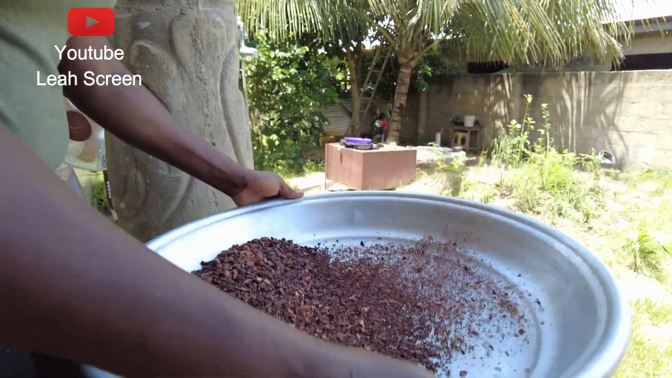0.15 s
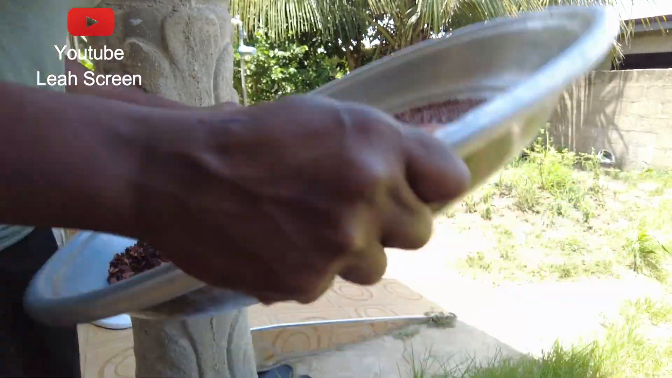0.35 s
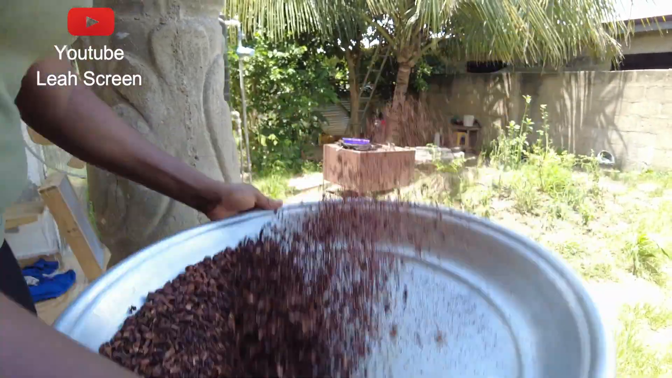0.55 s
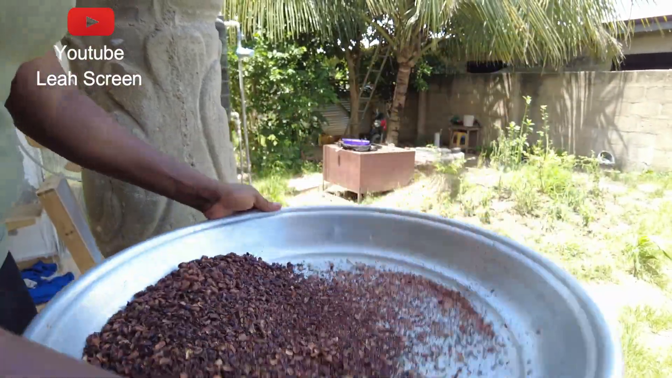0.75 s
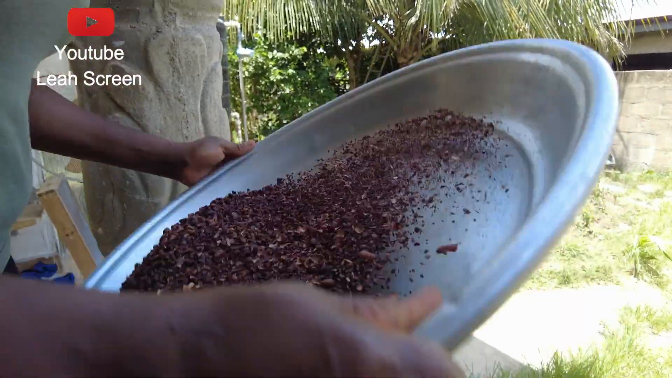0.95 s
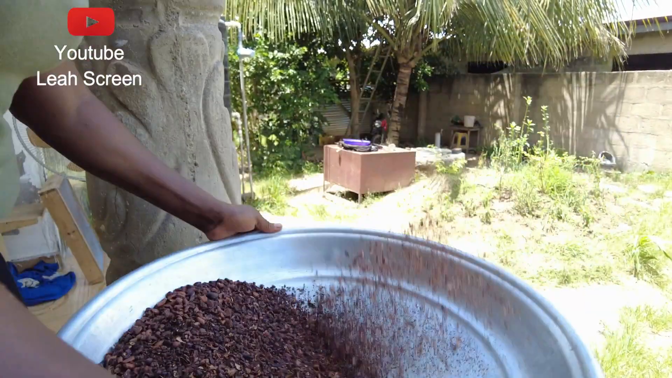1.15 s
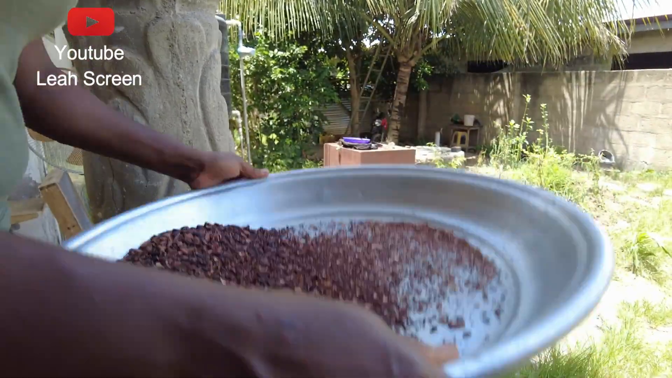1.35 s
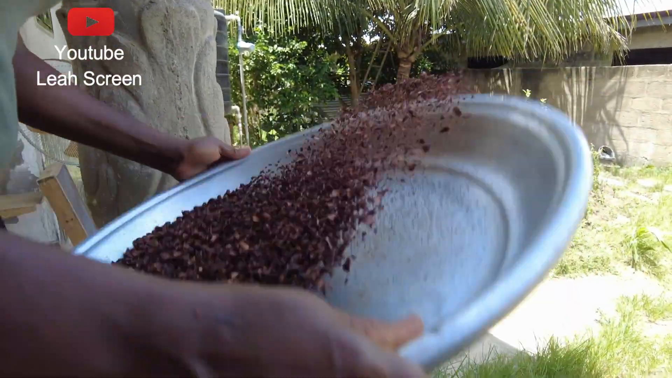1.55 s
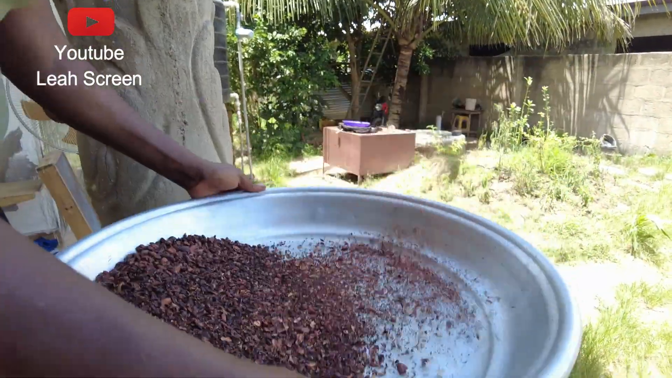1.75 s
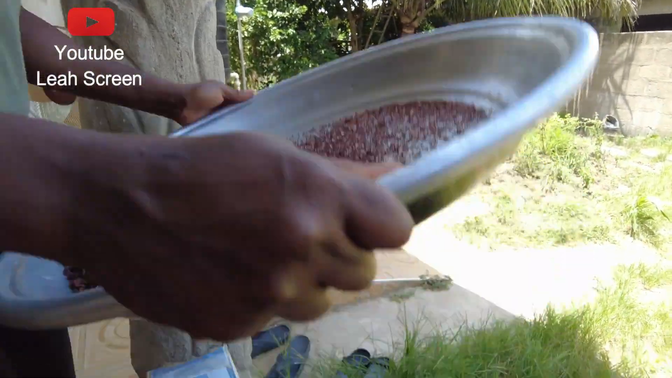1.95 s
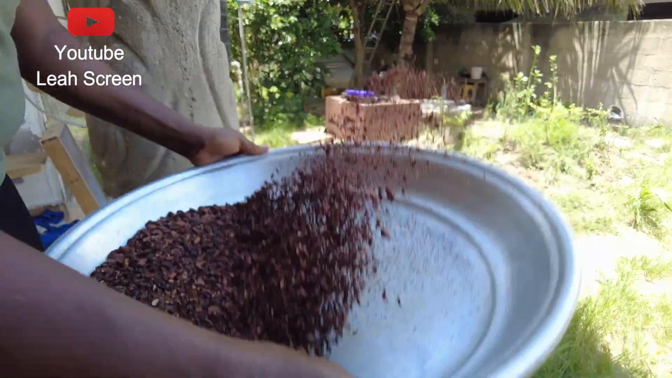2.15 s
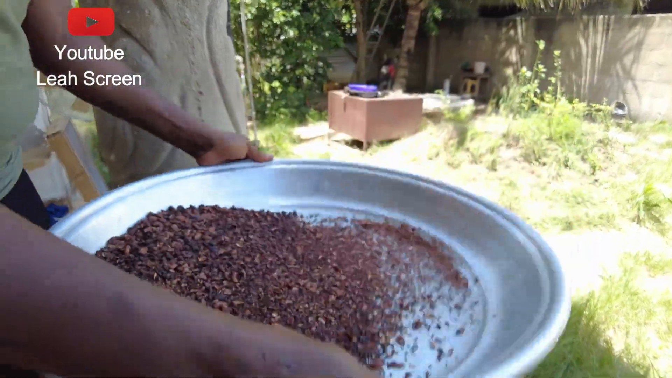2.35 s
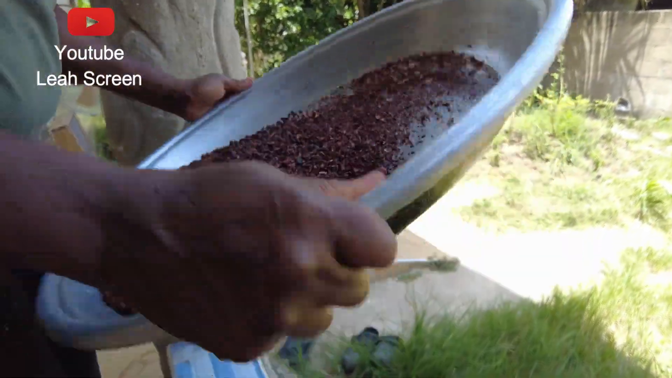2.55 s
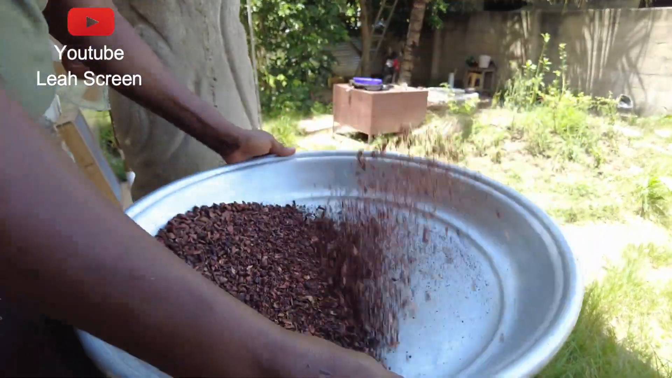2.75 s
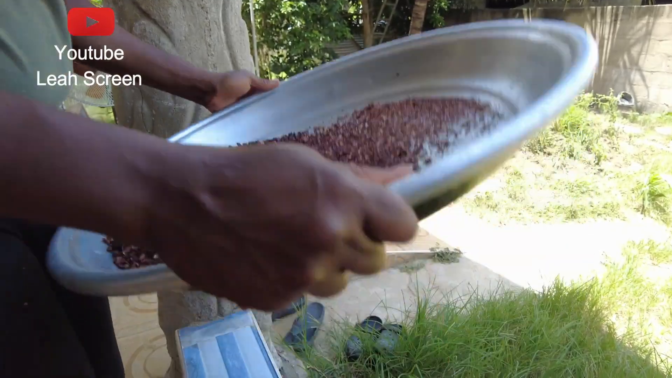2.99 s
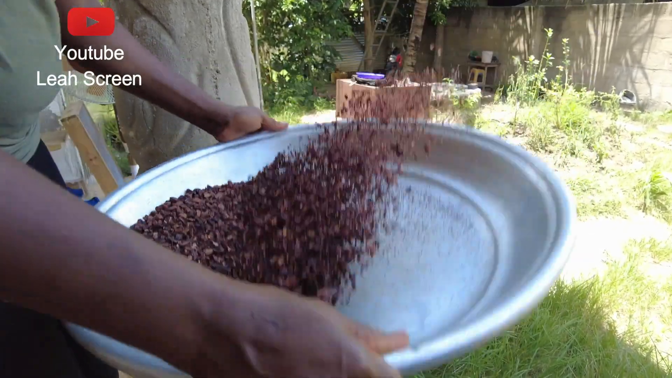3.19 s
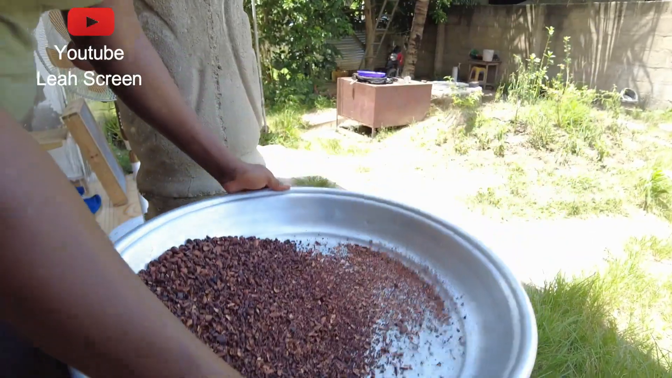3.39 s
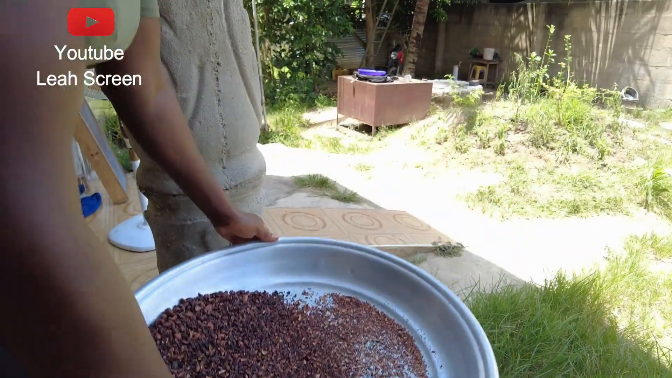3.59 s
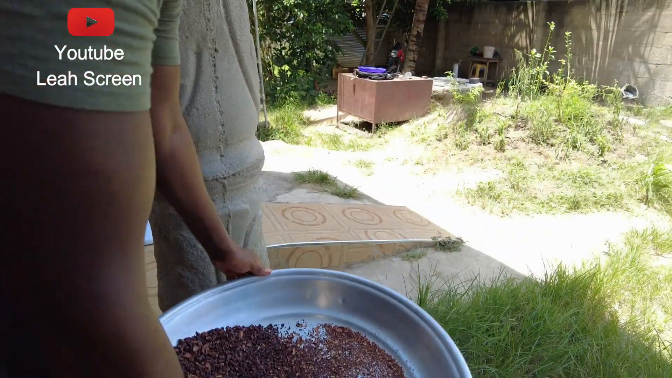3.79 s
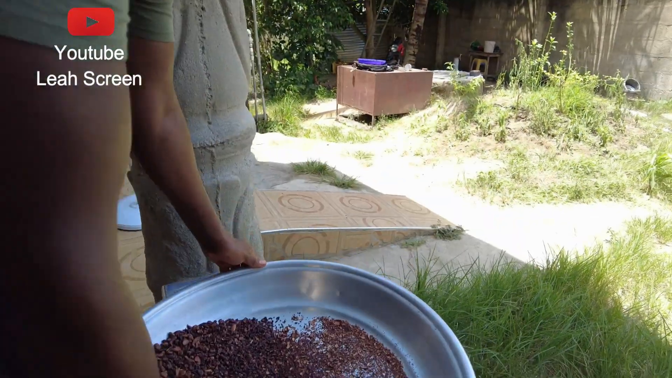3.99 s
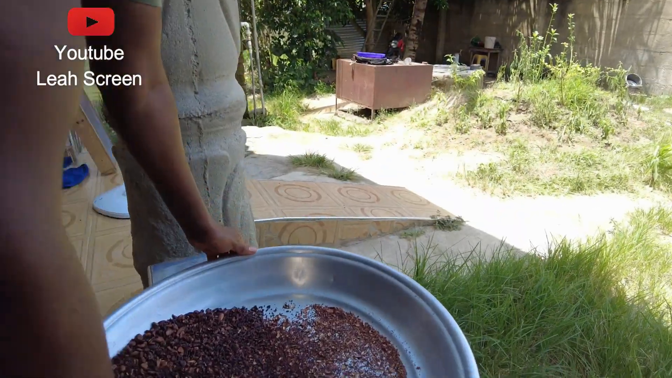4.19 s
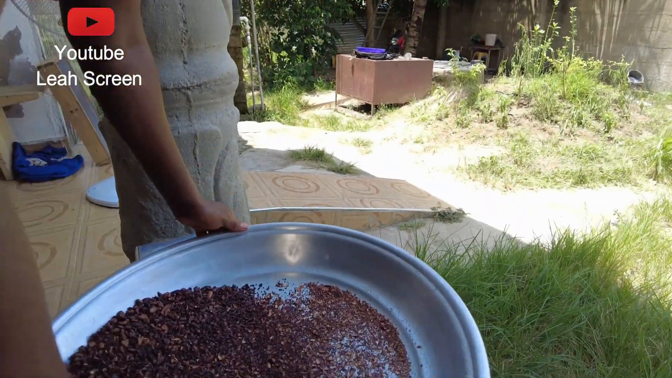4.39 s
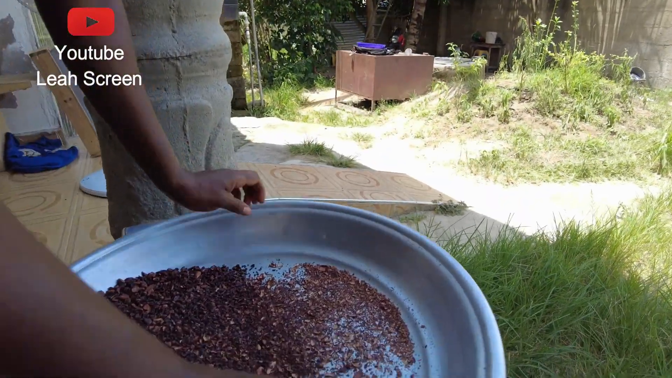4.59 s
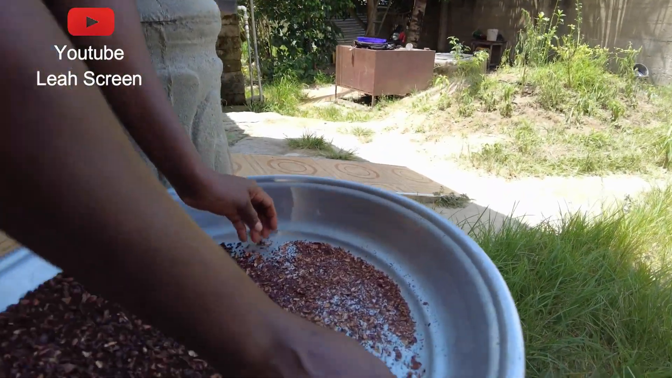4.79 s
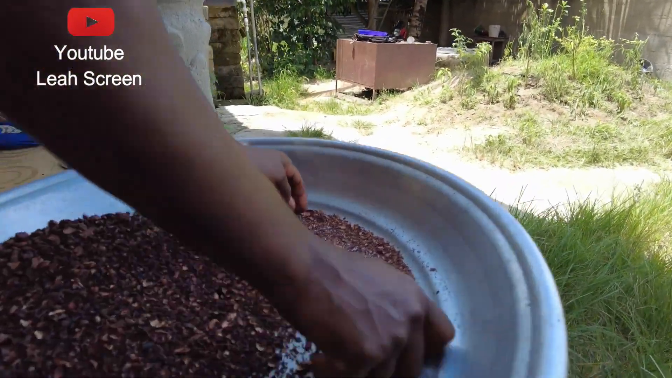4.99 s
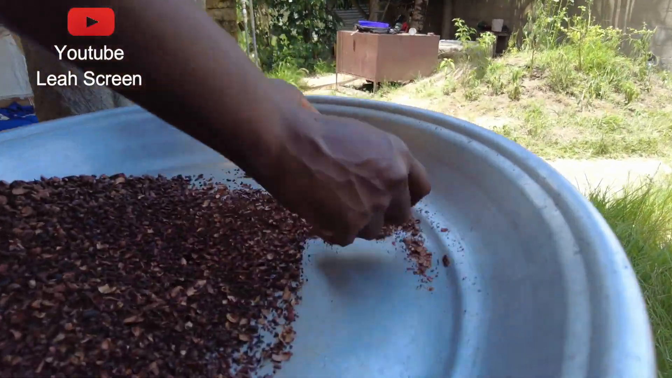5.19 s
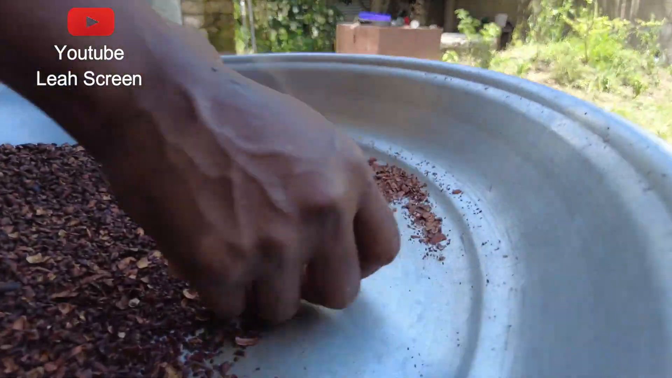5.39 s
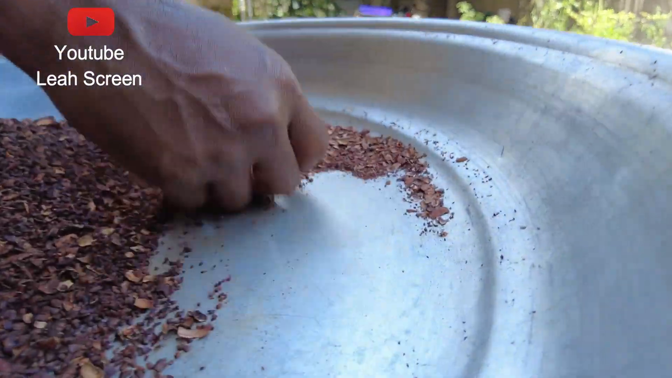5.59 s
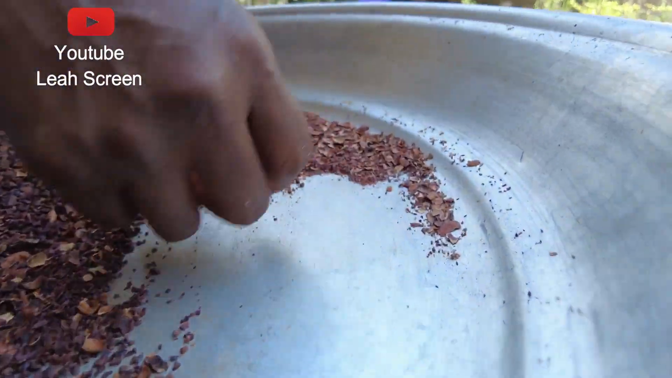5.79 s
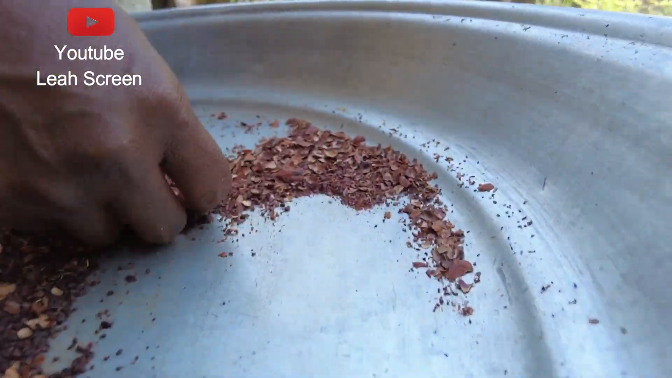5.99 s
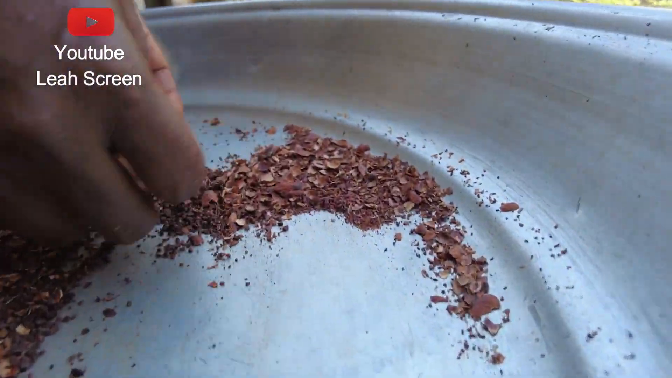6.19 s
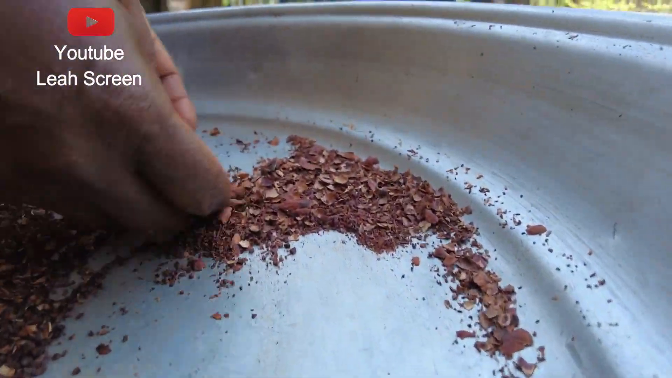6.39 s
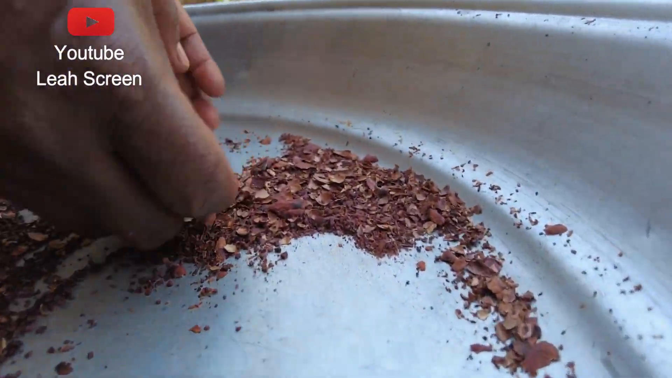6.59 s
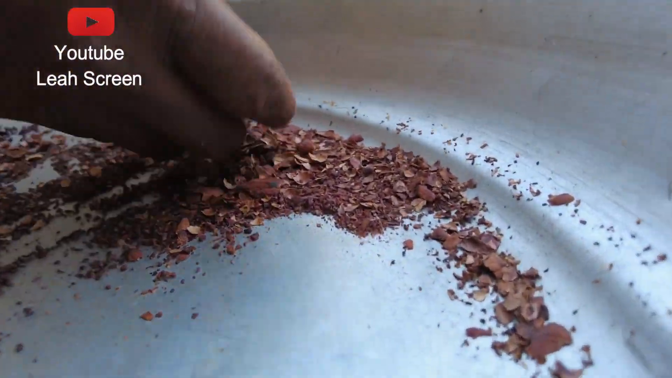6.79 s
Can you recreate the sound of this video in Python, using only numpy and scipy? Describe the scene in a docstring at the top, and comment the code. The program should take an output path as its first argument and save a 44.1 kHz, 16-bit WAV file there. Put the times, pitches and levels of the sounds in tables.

```python
"""Outdoors, crushed roasted beans are tossed seven times in a wide metal basin and rain back onto it.
The basin is then set down with a knock, rocks on its base, and fingers sweep the husks across the metal;
once the load rattles low after a knock. Showers, strokes and this rattling are sparse random impacts
filtered into rattle, drumming, thud, crackle and hiss; knocks and taps are damped modes with noise,
the rocking is a drifting sine, snaps are short noise; wind, hush and a faint hum are filtered noise."""
import sys
import numpy as np
from scipy import signal
from scipy.fft import rfft, irfft
from scipy.io import wavfile
from scipy.ndimage import uniform_filter1d

SR = 44100
rng = np.random.default_rng(int(sys.argv[2]) if len(sys.argv) > 2 else 0)


def master_out(mix):
    """Clip the mix to full scale and print it as 16-bit PCM to the path in sys.argv[1]."""
    frames = np.transpose(np.atleast_2d(mix))
    ceiling = np.clip(frames, -1, 1)
    pcm = np.round(ceiling * 32767).astype(np.int16)
    wavfile.write(sys.argv[1], SR, pcm)


N = 302085  # length in samples

# All levels are relative, and spectra give only a shape.
# Wind level over time. Each row: time in seconds, level in dB.
WIND_LEVEL = [(0.0, -48), (0.04, -42.5), (1.09, -37), (1.18, -51), (1.45, -36), (1.85, -42), (2.02, -38),
              (4.16, -43.5), (4.27, -39.5), (5.19, -36), (5.55, -29.5), (5.61, -39), (5.93, -30.5),
              (6.56, -39.5), (6.75, -30), (6.85, -33)]
# Spectra of wind rumble and of distant hush. Each row: frequency in Hz, density in dB per Hz.
WIND_SPECTRUM = [(10, 3), (22, 15), (35, -6.5), (60, -16.5), (90, -56.5)]
HUSH_SPECTRUM = [(29, -33), (50, -2), (141, -11.5), (342, -19.5), (686, -23.5), (812, -25.5), (916, -27),
                 (1110, -31.5), (1670, -29), (2020, -32.5), (4370, -37.5), (12000, -53.5), (15600, -53.5)]
HUSH_DB = -49
HUM_HZ, HUM_DB, HUM_WIDTH_HZ = 100.9, -57, 6  # a faint low hum in the distance

# Likeness of the two channels. Each row: frequency in Hz, left-right correlation (1 is identical).
CHANNEL_LIKENESS = [(60, .98), (170, .92), (350, .84), (700, .5), (1400, .78), (2800, .38), (5600, .07),
                    (10000, -.13), (14000, 0)]
# Balance of the two channels. Each row: frequency in Hz, left minus right in dB.
CHANNEL_BALANCE = [(60, -3), (240, 1), (950, 1.5), (3770, -1), (15000, 0.5)]

# Showers of tossed beans. Each row: landing in seconds, crash level in dB, rain level in dB,
# rain length in seconds, sharpness of the front in dB per s (before each layer's share),
# early beans in dB, late trickle in dB, extra swell of the rain in dB, then in dB relative to
# their usual rain: drumming, thud, crackle, hiss.
SHOWERS = [(0.032, -13, -16.5, 0.16, 1305.5, -45.5, -54, 4, 0, -1, 1.5, 1),
           (0.559, -12.5, -19, 0.17, 1599, -47, -59.5, -0.5, -1.5, 0, 1, 0.5),
           (1.093, -13, -20.5, 0.17, 1900, -54.5, -65.5, -2.5, -0.5, 0, 0.5, 0.5),
           (1.634, -12, -22, 0.17, 2002.5, -53.5, -65, -2.5, 0, 0, -1, 2),
           (2.165, -19, -20.5, 0.18, 1100, -67, -52, -0.5, 1, 2.5, 1.5, 3),
           (2.688, -27.5, -17.5, 0.18, 900, -33.5, -59.5, 1.5, 2, 2, 0.5, 2.5),
           (3.202, -14.5, -20, 0.18, 2396, -56, -52.5, -0.5, 1.5, 1, 0.5, 1.5)]
# Five layers of a shower: rattle on metal, drumming bottom, thud of the heap, crackle of shells, hiss
# of husks. Each row: offset in the crash in dB, build-up of the crash in seconds, offset in the rain
# in dB, swell over the rain in dB, time the rain outlasts its length in seconds, decay in dB per s,
# share of the front's sharpness.
SHOWER_LAYERS = [(-1, 0.016, 0.5, 0.5, -0.0077, 171, 0.95), (-26.5, 0.056, -14, 11.5, 0.005, 171.5, 0.57),
                 (-23.5, 0.04, -6, 11.5, -0.019, 174, 0.9), (-5.5, 0.004, -6.5, 1, 0.015, 184, 1.02),
                 (-7, 0.0074, -6, 7.5, 0.028, 201.5, 1.1)]
# Early and late beans: one offset in dB for each of the same five layers.
STRAY_LAYERS_DB = [0.5, -11.5, -1.5, -8, -10.5]
CRASH_DB_PER_S, EARLY_DB_PER_S, TRICKLE_DB_PER_S = 258, 331, 24
KNEE_S = 0.014  # softness of the bend where the rain starts to thin
LEAD_S, SHOWER_S = .11, .5  # time computed before and after the landing

# Broad resonances of the wall. Each row: frequency in Hz, width in Hz, level in dB.
WALL_MODES = [(1890, 26, -11.5), (2474, 41, 3.5), (2630, 56, -7.5), (3256, 110, -9)]
# Spectra of the held basin, the load shifting in the hands and the resting basin. Each holds three
# lists, for rattle, bottom and heap. Each row: frequency in Hz, density in dB per Hz.
HELD_SPECTRA = [
    [(1000, -41), (1700, -15.5), (2050, -6.5), (2220, -6.5), (2570, -2), (2920, -3.5), (3170, -3),
     (3770, -6), (4330, -3), (5200, -13.5), (6760, -29), (11400, -120)],
    [(76, -37), (130, -3.5), (199, -4.5), (258, 0), (323, -3), (450, -3.5), (580, -25), (990, -120)],
    [(260, -76), (450, -13.5), (500, -13), (578, 1), (863, -2.5), (959, 3), (1550, 2), (1700, -5),
     (2210, -31.5), (3740, -120)],
]
SHIFTING_SPECTRA = [
    [(1240, -44), (2100, -20), (2490, -8), (3440, -11), (5200, -18), (6760, -40), (11400, -120)],
    [(76, -36), (130, -1), (227, -12), (275, 0), (450, -6), (580, -43), (990, -120)],
    [(260, -36), (450, -2), (579, 1.5), (852, -5.5), (1030, -5), (1920, -23), (2100, -32), (2730, -54),
     (4620, -120)],
]
RESTING_SPECTRA = [
    [(1240, -65), (2100, -20), (2500, -3.5), (2900, -2.5), (3600, -8), (4400, -3), (5200, -16), (6760, -30),
     (11400, -120)],
    [(47, -34), (80, 0.5), (118, -10), (150, -11.5), (190, -13.5), (237, 0), (296, -11.5), (339, -10.5),
     (370, -10), (450, -26), (580, -53), (990, -120)],
    [(260, -32), (450, -1), (702, -1), (868, -8), (914, -0.5), (1080, -5), (1180, -2.5), (1340, -3.5),
     (2100, -14), (2730, -39.5), (4620, -120)],
]
# Spectra of crackling shells and hissing husks. Each row: frequency in Hz, density in dB per Hz.
SHELL_SPECTRUM = [(4000, -42.5), (5000, -6), (6000, -1), (7100, -6), (8500, -6), (10000, -11.5),
                  (12000, -24)]
HUSK_SPECTRUM = [(8000, -14), (10000, -3.5), (11600, -3), (14500, 1.5), (15200, 3), (15800, -8.5)]

# Fingers shift and tap on the rim. Each row: start in seconds, level in dB, pitch in Hz,
# level of the crack in dB relative to the tap.
RIM_TAPS = [(0.455, -33, 700, -22), (0.494, -27, 650, -30), (0.993, -32, 550, -16), (1.536, -29, 560, -26),
            (2.041, -31.5, 573, -23), (2.566, -18, 649, -28), (2.64, -17, 670, -25),
            (3.483, -12.5, 900, -10.5), (3.661, -32.5, 426, -3), (3.759, -29, 440, -25),
            (3.944, -23.5, 422, -20), (4.112, -34, 412, -33), (4.444, -32, 854, -22),
            (4.582, -27, 385, -25.5), (4.895, -28, 416, -22), (4.925, -24, 1114, -11),
            (5.394, -33, 390, -31), (5.533, -36, 715, 2.5), (5.824, -22.5, 396, -9.5),
            (6.215, -26, 400, -18), (6.252, -36, 560, -17)]

# The load shifts while the held basin is lowered, and stirs in the resting basin.
# Each row: time in seconds, then levels in dB of rattle, drumming, thud, crackle.
LOWERING_LEVELS = [(3.5, -47, -38.5, -45, -48), (3.62, -61, -56, -54.5, -58), (3.7, -61.5, -49, -51.5, -65),
                   (3.85, -62, -52, -49, -79), (3.95, -67.5, -51, -53, -78.5), (4.0, -68, -49, -54, -85),
                   (4.09, -81, -65, -62, -84), (4.17, -67.5, -73, -63, -78), (4.245, -70, -62, -69.5, -90)]
STIRRING_LEVELS = [(4.33, -50, -32, -42, -73), (4.42, -67, -41, -51, -80), (4.51, -57, -57, -60, -64),
                   (4.58, -60, -48, -70, -62), (4.64, -77, -57, -60, -80), (4.72, -71, -67, -67, -75),
                   (4.87, -58.5, -69, -59.5, -60.5), (4.94, -58, -42, -53, -59), (5.3, -62, -69, -70, -76),
                   (5.39, -79.5, -57, -76, -83), (5.5, -80, -56, -76, -85), (5.8, -57.5, -54.5, -57, -67),
                   (5.86, -84, -62, -61, -74), (6.2, -76, -40.5, -63, -70), (6.33, -62, -41.5, -54, -74),
                   (6.58, -64.5, -60, -57, -74), (6.7, -60, -54, -56, -65), (6.85, -59, -55, -56, -65)]
STIR_HISS_DB = -6  # relative to crackle

# Single husks snap. Each row: start in seconds, level in dB.
HUSK_SNAPS = [(3.663, -37), (4.9262, -38), (5.8234, -43), (5.8471, -51), (5.8795, -54), (5.937, -53),
              (6.2194, -50), (6.541, -42), (6.6163, -51)]
# Each row: frequency in Hz, density in dB per Hz.
SNAP_SPECTRUM = [(1500, -20), (4000, -3), (9000, 0), (15800, -4)]

# The resting basin wobbles. Each row: time in seconds, level in dB.
WOBBLE_LEVEL = [(4.24, -46), (4.28, -22), (4.37, -31.5), (4.43, -46), (4.52, -52), (4.61, -35.5),
                (4.78, -45), (4.92, -35), (4.97, -40), (5.02, -32), (5.1, -37.5), (5.41, -26.5),
                (5.69, -35), (5.72, -23), (5.8, -30), (5.85, -19.5), (6.01, -33), (6.03, -27), (6.19, -29),
                (6.22, -23), (6.44, -29.5), (6.67, -46), (6.75, -37), (6.85, -55)]
# Central pitch of the wobble. Each row: time in seconds, frequency in Hz.
WOBBLE_PITCH = [(4.24, 38), (5.1, 38.53), (5.95, 39.2), (6.2, 41.8), (6.4, 45.2), (6.85, 47)]

# Knocks of the basin on the ground. Each row: start in seconds, level in dB, hardness in dB,
# 60 dB decay time at 250 Hz in seconds, 60 dB decay time of the grit in seconds.
GROUND_KNOCKS = [(4.265, -4.5, 3.5, 0.19, 0.076), (4.309, -14, 8, 0.16, 0.047),
                 (4.332, -24, -2, 0.12, 0.04), (4.951, -28, 18.5, 0.064, 0.045),
                 (4.99, -27, -12, 0.1, 0.04), (5.393, -36, -11, 0.069, 0.04), (5.88, -25, 10.5, 0.11, 0.13),
                 (5.968, -21.5, 8, 0.28, 0.06), (6.06, -19, 3, 0.22, 0.071), (6.225, -35, 0, 0.16, 0.04),
                 (6.352, -17, -8, 0.22, 0.035), (6.736, -22.5, 0, 0.13, 0.06)]
# Modes of the basin. Each row: frequency in Hz, level in dB.
BASIN_MODES = [(192, -16), (247.3, -6), (297, -16.5), (325.5, -17.5), (370, -20), (535, -29), (660, -25.5),
               (880, -24), (1276, -29), (1590, -22), (2360, -27), (2783, -20), (3440, -28)]
# Spectrum of the grit in a knock. Each row: frequency in Hz, density in dB per Hz.
GRIT_SPECTRUM = [(200, 8), (900, 5), (1900, -3), (2600, 3), (3600, -8), (4400, -11),
                 (7000, -17.5), (14000, -36)]

# Faint tones that linger in the metal. Each row: start in seconds, end in seconds, frequency in Hz,
# level in dB, width of the first resonance in Hz.
LINGERING_TONES = [(4.416, 4.56, 910, -55, 45), (4.562, 4.9, 1745, -68.5, 21), (4.948, 5.05, 920, -51, 8.3),
                   (5.878, 5.958, 1850, -44, 120), (6.472, 6.694, 1021, -50.5, 53),
                   (6.483, 6.727, 873, -59, 67)]

# Strokes of the fingers through the husks; the third row is the low rattling of the load after a knock.
# Each row: start in seconds, crest in seconds, end in seconds, rattle level in dB, swell to the crest
# in dB, release in dB per s, then in dB relative to the rattle: drumming, thud, crackle, hiss.
STROKES_AND_RATTLING = [(4.962, 5.14, 5.24, -39.5, 10, 256, 1, 0, -3, -3),
                        (5.53, 5.635, 5.69, -39.5, 10, 489, 1.5, 0.5, -3.5, 2),
                        (5.884, 5.898, 5.95, -58, -5, 300, 24, 18, 0, -25),
                        (5.97, 6.017, 6.04, -39, 0, 500, 2.5, -2.5, -17, -14),
                        (6.064, 6.088, 6.125, -41, 9, 338, 4, 0, -3.5, -0.5),
                        (6.372, 6.428, 6.495, -36, 8, 650, 2, -5, -5.5, -0.5),
                        (6.737, 6.805, 6.83, -42, 0.5, 450, 10.5, 1.5, -7, -4)]
GRIP_DB_PER_S, SAG_DB_PER_S = 1202, 81  # rise before the start; slackening after the crest
AFTER_DB, AFTER_DB_PER_S = -12, 127.5  # tail that lingers after the end
DRUM_SWELL, HISS_SWELL = 0.6, 1.5  # shares of the swell that bottom and husks follow
HISS_LAG = 0.51  # husks crest this share of the way from crest to end

EDGE_HZ = 15790  # upper band limit


def amp(db):
    """Decibels are a logarithmic measure of amplitude."""
    return 10 ** (np.asarray(db) / 20)


def evened(x):
    """Dividing by the root mean square gives a signal unit power."""
    return x / np.sqrt(np.mean(x ** 2) + 1e-20)


def summed(*levels_db):
    """Powers, not amplitudes, add when unrelated sounds are heard together."""
    return 10 * np.log10(sum(amp(db) ** 2 for db in levels_db) + 1e-14)


def read(points, hz):
    """Spectra are interpolated on a logarithmic frequency axis, as pitch is heard."""
    f, value = np.transpose(points)
    return np.interp(np.log(hz + 1), np.log(f + 1), value)


def add(mix, s, sound):
    """Superposition: a sound starting at s seconds adds to the mix, cut at its end."""
    part = mix[..., round(s * SR):][..., :sound.shape[-1]]
    part += sound[..., :part.shape[-1]]


def noise(n):
    """Two unrelated white noises hold equal power at all frequencies."""
    return rng.standard_normal((2, n))


def smooth_noise(n, size):
    """Two moving averages pass only the slow fluctuations of a noise."""
    x = rng.standard_normal(n)
    return evened(uniform_filter1d(uniform_filter1d(x, size), size))


def lumps(n):
    """Slow fluctuation: random swells some 25 ms long."""
    return smooth_noise(n, 800)


def coloured(pair, spectrum):
    """Partial coherence: two unrelated signals are filtered and blended into a left-right pair."""
    n = pair.shape[1]
    hz = np.fft.rfftfreq(n, 1 / SR)
    a, b = rfft(pair)
    same = np.clip(read(CHANNEL_LIKENESS, hz), -1, 1)
    balance = amp(read(CHANNEL_BALANCE, hz) / 2)
    left = a * balance
    right = (same * a + np.sqrt(1 - same ** 2) * b) / balance
    return evened(irfft(np.array([left, right]) * amp(read(spectrum, hz)), n))


def ring(x, modes):
    """Resonance: x excites damped modes, each of peak gain 1 times its level."""
    return sum(amp(db) * signal.lfilter(*signal.iirpeak(hz, hz / width, SR), x)
               for hz, width, db in modes)


def air():
    """Turbulence and distance: wind rumbles on the microphone over the steady hush and hum of the yard."""
    s, db = np.transpose(WIND_LEVEL)
    rumble = coloured(noise(N), WIND_SPECTRUM) * amp(np.interp(np.arange(N) / SR, s, db))
    hum = ring(rng.standard_normal(N), [(HUM_HZ, HUM_WIDTH_HZ, 0)])
    hum = amp(HUM_DB) * evened(ring(hum, [(HUM_HZ, 2 * HUM_WIDTH_HZ, 0)]))
    hush = amp(HUSH_DB) * coloured(noise(N), HUSH_SPECTRUM)
    return rumble + hum + hush


def shower(land, crash_db, rain_db, length, front, early_db, trickle_db, extra_db, *colour_db):
    """Superposed impact levels: a few early beans, a crash, a rain that thins out, a last trickle."""
    t = np.arange(max(land - LEAD_S, 0), land + SHOWER_S, 1 / SR) - land
    before, after = np.minimum(t, 0), np.maximum(t, 0)
    early = early_db + EARLY_DB_PER_S * before
    trickle = trickle_db - TRICKLE_DB_PER_S * (after - length)
    strays = np.where(t < 0, early, trickle)
    levels = []
    for layer, stray_db, own_db in zip(SHOWER_LAYERS, STRAY_LAYERS_DB, (0,) + colour_db):
        hit_db, build, wet_db, swell_db, late, dying, share = layer
        crash = crash_db + hit_db - CRASH_DB_PER_S * abs(after - build)
        swell = (swell_db + extra_db) * np.maximum(1 - after / length, 0)
        thinning = dying * KNEE_S * np.logaddexp(0, (t - length - late) / KNEE_S)
        rain = rain_db + wet_db + own_db - swell - thinning
        main = summed(crash, rain) + share * front * before
        levels.append(summed(main, strays + stray_db))
    return land + t[0], levels


def grains(n, per_s, spread_db):
    """Random point process: two sparse trains of impacts swell in clumps, a few much stronger than the rest."""
    clumps = amp(0.61 * smooth_noise(n, 300))
    size = amp(spread_db * np.minimum(rng.exponential(1, (2, n)), 4.5))
    sign = rng.choice([-1., 1.], (2, n))
    return clumps * size * sign * (rng.random((2, n)) < per_s / SR)


def patches(hits, t60, count=14):
    """Modal response: each bean strikes one patch of sheet metal, which answers with brief modes.

    t60 is the 60 dB decay time in seconds at 1000 Hz."""
    t = np.arange(1800) / SR
    where = rng.integers(0, count, hits.shape)
    out = 0
    for k in range(count):
        hz = 150 * 70 ** rng.random((40, 1))
        waves = np.sin(2 * np.pi * (hz * t + rng.random((40, 1))))
        decay = amp(-60 * t / (t60 * (1000 / hz) ** 0.14))
        answer = (waves * decay * np.sqrt(hz / 1000)).sum(0)
        out = out + signal.oaconvolve(hits * (where == k), answer[None], axes=1)[:, :hits.shape[1]]
    return evened(out)


def beans(start, levels, spectra, per_s, spread_db, ring_db, tick, t60, uneven_db):
    """Impact excitation: the wall rattles and rings, bottom and heap thud, shells crackle, husks hiss."""
    rattle_db, drum_db, thud_db, crackle_db, hiss_db = (
        db + uneven_db * lumps(len(db)) for db in levels)
    rattle_spectrum, bottom_spectrum, heap_spectrum = spectra
    n = len(rattle_db)
    t = np.arange(n) / SR
    hits = grains(n, per_s, spread_db)
    metal = tick * evened(hits) + patches(hits, t60)
    rattle = coloured(metal, rattle_spectrum) * amp(rattle_db)
    wall = amp(ring_db) * ring(rattle * amp(1.8 * lumps(n)), WALL_MODES)
    rattle = (rattle + wall) * amp(1.38)
    drum = coloured(metal, bottom_spectrum) * amp(drum_db)
    thud = coloured(metal, heap_spectrum) * amp(thud_db)
    crackle = coloured(metal, SHELL_SPECTRUM) * amp(crackle_db)
    light_hits = grains(n, 12000, 1.8)
    hiss = coloured(1.9 * hits + light_hits, HUSK_SPECTRUM) * amp(hiss_db)
    fade = np.sqrt(np.clip(np.minimum(t, t[-1] - t) / .005, 0, 1))  # 5 ms at both ends
    return start, (rattle + drum + thud + crackle + hiss) * fade


def tap(level_db, hz, crack_db):
    """Strong damping: hand-held metal gives a dull brief thump, a short crack and a noisy tail."""
    t = np.arange(2600) / SR
    thump = np.sin(2 * np.pi * hz * t) * amp(-60 * t / 0.013)
    tail = coloured(noise(len(t)), [(150, -20), (hz, 0), (2500, -14), (6000, -40)])
    tail *= amp(-12 - 60 * t / 0.097)
    crack = coloured(noise(len(t)), HELD_SPECTRA[0]) * amp(crack_db + 1.5 - 60 * t / 0.027)
    return amp(level_db - 4.5) * (thump + tail + crack)


def stir(rows):
    """Continuous friction: the levels of a load that moves a little all the time are interpolated."""
    s, *columns = np.transpose(rows)
    t = np.arange(s[0], s[-1], 1 / SR)
    levels = [np.interp(t, s, column) for column in columns]
    return s[0], levels + [levels[-1] + STIR_HISS_DB]


def snap(level_db):
    """Sudden release: a husk gives a dry click, noise that decays within milliseconds."""
    t = np.arange(600) / SR
    return amp(level_db - 2 - 60 * t / 0.024) * coloured(noise(len(t)), SNAP_SPECTRUM)


def wobble():
    """Slow flexure: the loaded bottom sounds a near sine whose pitch drifts and wanders."""
    t = np.arange(N) / SR
    wander = 1 + .07 * smooth_noise(N, 2500)
    turns = np.cumsum(np.interp(t, *np.transpose(WOBBLE_PITCH)) * wander) / SR
    level = amp(np.interp(t, *np.transpose(WOBBLE_LEVEL), left=-120))
    return np.sqrt(2) * level * np.sin(2 * np.pi * turns)


def knock(level_db, hard_db, ring_s, grit_s):
    """Modal excitation: all basin modes start at once; a harder contact wakes the upper ones and grit."""
    t = np.arange(SR // 3) / SR
    body = 0
    for k, (hz, db) in enumerate(BASIN_MODES, 1):
        decay_s = ring_s * (250 / hz) ** 1.13  # damped by load and ground
        decay = amp(db + hard_db * (hz > 600) - 60 * t / decay_s)
        body = body + (-1) ** k * decay * np.sin(2 * np.pi * hz * t)  # neighbours swing oppositely
    grit = coloured(noise(len(t)), GRIT_SPECTRUM)
    jolt = amp(-60 * t / grit_s) + amp(-8.5 - 60 * t / 0.26)  # the load rattles on after the contact
    onset = np.minimum(t / 0.00087, 1)
    return amp(level_db) * (body + amp(hard_db - 19.5) * grit * jolt) * onset


def tone(start, end, hz, db, width_hz):
    """Narrow-band resonance: filtered noise becomes a slightly fuzzy hum."""
    n = round((end - start) * SR)
    settling = 9000  # samples dropped while the resonance builds
    fuzz = ring(rng.standard_normal(n + settling), [(hz, width_hz, 0)])[settling:]
    hum = evened(ring(evened(fuzz), [(hz, 2 * width_hz, 0)]))
    return start, amp(db) * hum * signal.windows.tukey(n, .7)


def stroke_or_rattling(start, crest, end, db, swell_db, release, drum_db, thud_db, crackle_db, hiss_db):
    """Force envelope: a stroke grips, crests, slackens and lets go; rattling after a knock shares the form."""
    t = np.arange(start - .04, end + .3, 1 / SR)
    grip = GRIP_DB_PER_S * np.minimum(t - start, 0)
    gone = np.maximum(t - end, 0)
    # loose husks slide on a little after a stroke
    level = db + grip + summed(-release * gone, AFTER_DB - AFTER_DB_PER_S * gone)

    def swell(top):
        """A linear ramp in dB leads to the top, and a sag follows until the end."""
        ramp = swell_db * np.clip((top - t) / max(top - start, .005), 0, 1)
        sag = SAG_DB_PER_S * np.clip(t - top, 0, max(end - top, 0))
        return -ramp - sag

    firm = swell(crest)
    late = swell(crest + HISS_LAG * (end - crest))
    return t[0], [level + firm,
                  level + DRUM_SWELL * firm + drum_db,
                  level + firm + thud_db,
                  level + firm + crackle_db,
                  level + HISS_SWELL * late + hiss_db]


def scene():
    """Superposition of air, tosses, lowering, resting load and single contacts."""
    mix = air() + wobble()
    for row in SHOWERS:
        add(mix, *beans(*shower(*row), HELD_SPECTRA, per_s=3500, spread_db=2.0, ring_db=-2.0,
                        tick=0.46, t60=0.033, uneven_db=0.63))
    add(mix, *beans(*stir(LOWERING_LEVELS), SHIFTING_SPECTRA, per_s=710, spread_db=4.0, ring_db=-19.5,
                    tick=0.39, t60=0.073, uneven_db=1.5))
    moves = [stroke_or_rattling(*row) for row in STROKES_AND_RATTLING]
    for start, levels in [stir(STIRRING_LEVELS)] + moves:
        add(mix, *beans(start, levels, RESTING_SPECTRA, per_s=1500, spread_db=2.5, ring_db=1.0,
                        tick=0.76, t60=0.041, uneven_db=2.0))
    for table, sound in ((RIM_TAPS, tap), (HUSK_SNAPS, snap), (GROUND_KNOCKS, knock)):
        for s, *row in table:
            add(mix, s, sound(*row))
    for row in LINGERING_TONES:
        add(mix, *tone(*row))
    return mix


def record(dry):
    """Saturation and band limiting: the input stage rounds the highest peaks, then a low-pass follows."""
    rounded = dry / (1 + (abs(dry) / .95) ** 6) ** (1 / 6) * .93
    low_pass = signal.firwin(1023, EDGE_HZ, window=("kaiser", 11), fs=SR)
    return signal.oaconvolve(rounded, low_pass[None], "same")


dry = scene()
out = record(dry)
master_out(out)
```